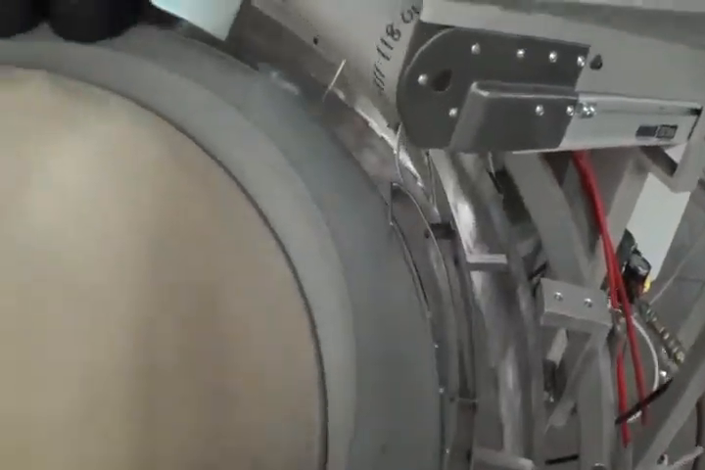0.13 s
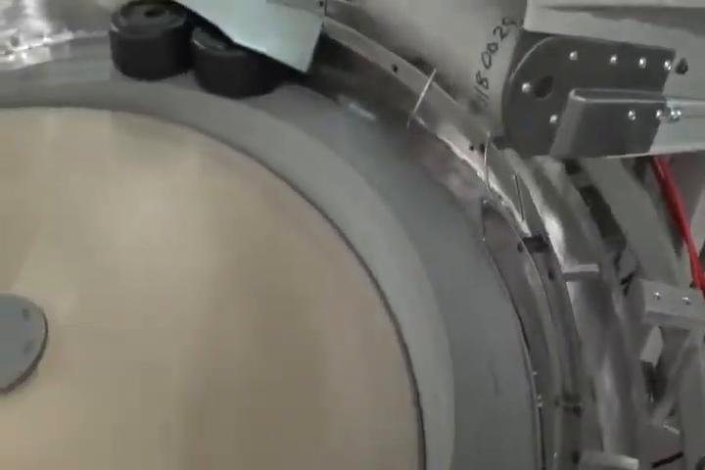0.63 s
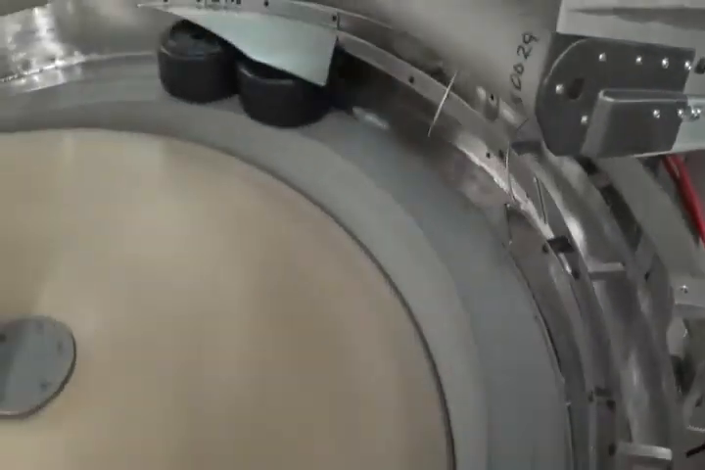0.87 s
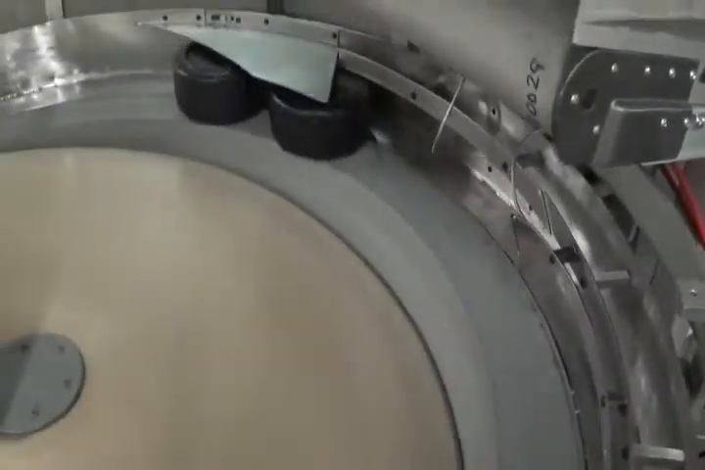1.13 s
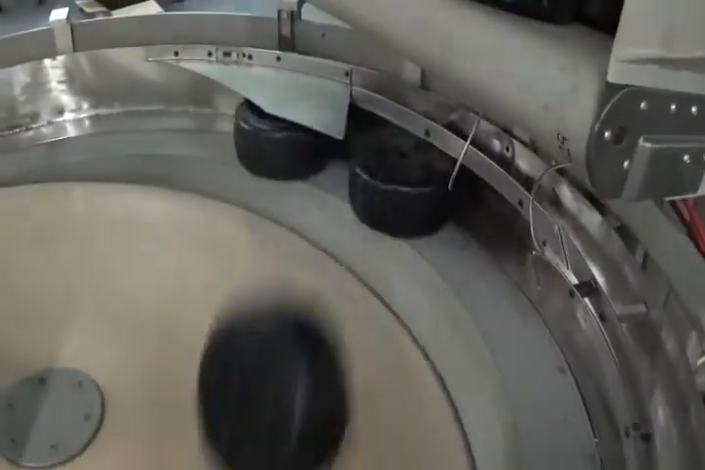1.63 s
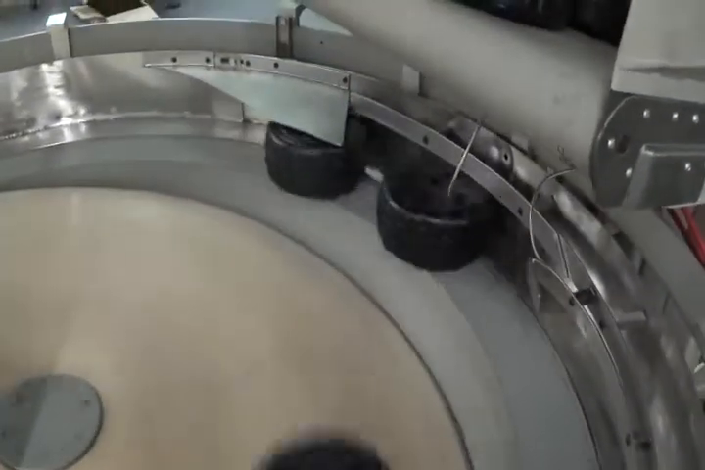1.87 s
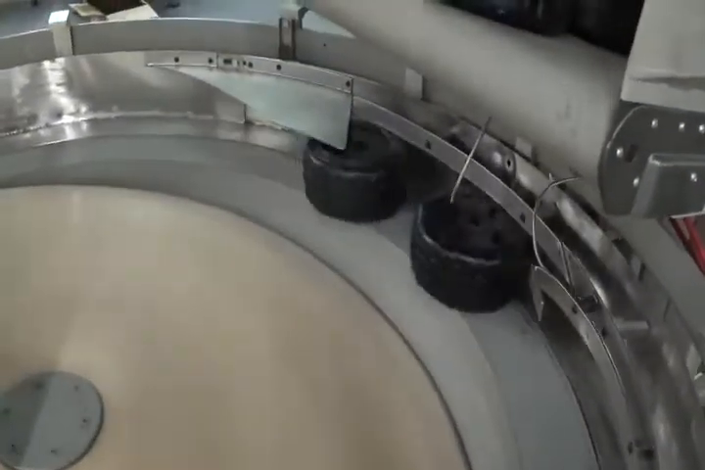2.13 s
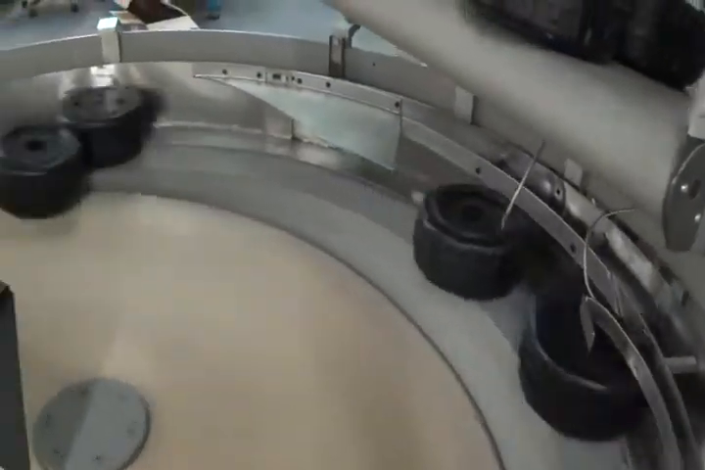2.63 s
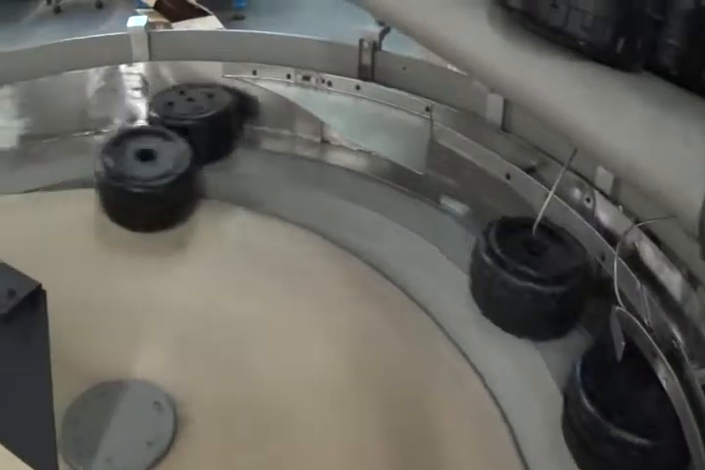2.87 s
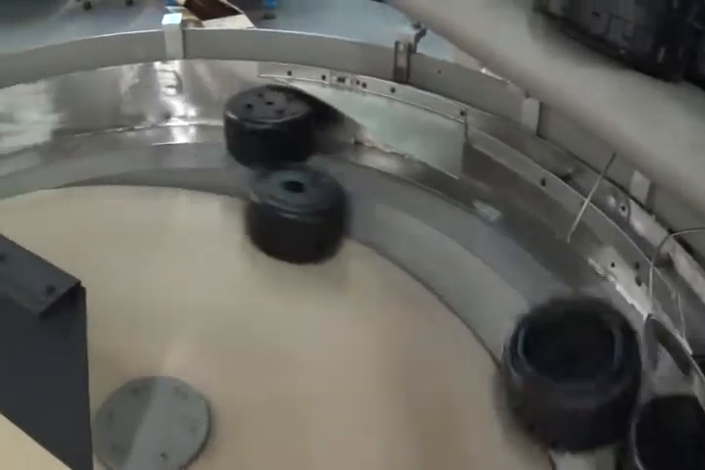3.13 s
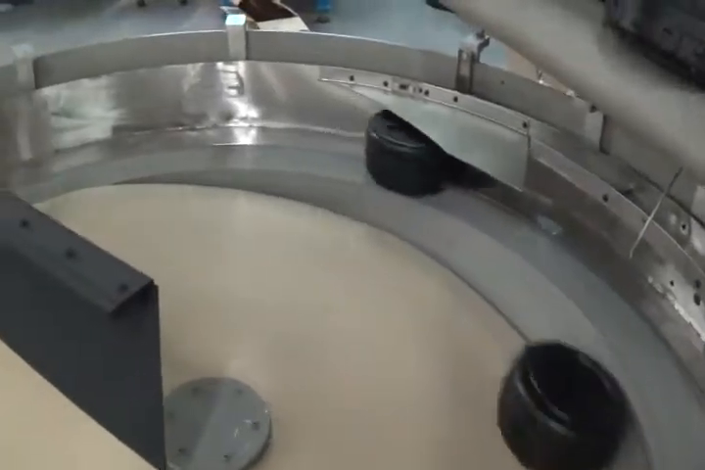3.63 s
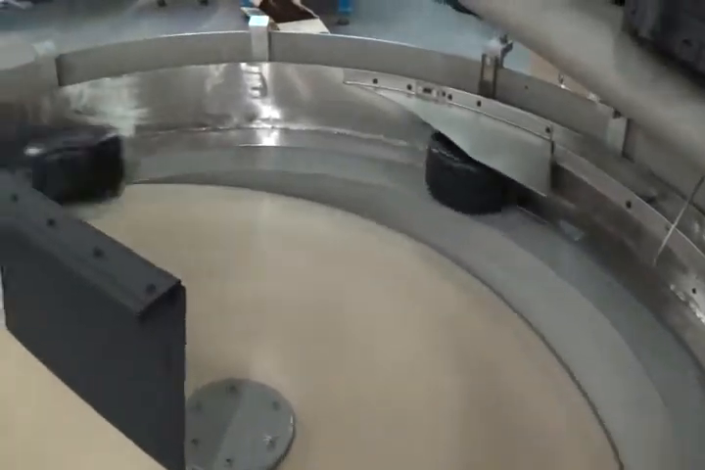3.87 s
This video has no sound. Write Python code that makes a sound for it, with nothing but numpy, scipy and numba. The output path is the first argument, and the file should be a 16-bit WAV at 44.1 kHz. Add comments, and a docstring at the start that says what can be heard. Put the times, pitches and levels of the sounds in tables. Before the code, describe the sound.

A continuous high, piercing air hiss dominates, wavering slightly and drifting left as the hand-held microphone turns; small wheels knock and scuff underneath, then air rushes lower over passing wheels, above a quiet factory hum.

```python
"""At a steel feeder bowl in a factory, compressed-air jets hiss along the rim round a slowly turning, hand-held
microphone pair. The jets are turbulence noise, filtered in bands; a delayed image from the bowl wall combs them.
Hollow plastic wheels knock, scuff and thud on track and disc as decaying modes, smeared by the bowl, and,
crossing a jet, add a lower rush of sliding band noise. A factory drones behind as coloured noise with two hums."""
import sys
import numpy as np
from scipy import signal
from scipy.fft import rfft, irfft
from scipy.io import wavfile
from scipy.ndimage import uniform_filter1d, map_coordinates
from numba import njit

SR = 44100
rng = np.random.default_rng(int(sys.argv[2]) if len(sys.argv) > 2 else 0)


def voltage_ratio(level):
    """Linear amplitude factor for a level in decibels (scalar or array-like)."""
    return 10 ** (np.asarray(level, float) / 20)


def wav_out(sig):
    """Save sig, one row per channel (or a flat mono array), as 16-bit PCM at SR to the path in sys.argv[1]."""
    wavfile.write(sys.argv[1], SR, np.round(np.clip(np.atleast_2d(sig).T, -1, 1) * 32767).astype(np.int16))


N = 176400


def read(table, col):
    """Linear interpolation: a table column over scene time."""
    a = np.array(table, float)
    return np.interp(np.arange(N) / SR, a[:, 0], a[:, col])


def at(table, hz):
    """Logarithmic frequency interpolation: a spectrum's value at hz."""
    a = np.array(table, float)
    return np.interp(np.log(hz), np.log(a[:, 0]), a[:, 1])


def unit(x):
    """Normalisation to an rms of 1."""
    return x / np.sqrt(np.mean(x ** 2))


def walk(rate):
    """Slow random modulation: levels held 1 / rate seconds, smoothed twice; spread near 1."""
    hold = int(SR / rate)
    steps = np.repeat(rng.standard_normal(N // hold + 1), hold)
    return 1.3 * uniform_filter1d(uniform_filter1d(steps, hold), hold)[:N]


def pan(x, db):
    """Intensity stereo: db is the level of left minus right."""
    return x * voltage_ratio(np.array([db, -db]).reshape(2, -1) / 2)


def bands(spectrum, gain_db, pan_db, count):
    """Filter-bank synthesis: noise in count bands an octave, each with a gain and side; total rms 1."""
    # stereo width, side against mid: f/Hz, level/dB
    side_spectrum = [(60, -10), (110, -23), (200, -19.5), (380, -13.5), (700, -7), (1290, -7.5),
                     (2380, -10), (4400, -10.5), (8120, -15), (15000, -19)]
    hz = np.maximum(np.arange(N // 2 + 1) * SR / N, 1)
    mid, side = rfft(rng.standard_normal((2, N))) * voltage_ratio(at(spectrum, hz))
    pair = mid + side * voltage_ratio(at(side_spectrum, hz)) * np.array([[1], [-1]])
    centres = 2 ** (np.arange(count * 15) / count)
    centres = centres[(centres > spectrum[0][0]) & (centres < spectrum[-1][0] * 1.2)]
    total = np.zeros((2, N))
    for centre in centres:
        # triangular on a log axis, so that neighbouring bands sum to one
        share = np.clip(1 - count * np.abs(np.log2(hz / centre)), 0, 1)
        band = irfft(pair * share, N) * voltage_ratio(gain_db(centre))
        total += pan(band, pan_db(centre))
    return unit(total)


@njit
def svf(x, hz, width):
    """State-variable resonance: a band-pass with a moving centre, gain 1 there; width is over centre."""
    y, band, low = np.empty(len(x)), 0., 0.
    for i in range(len(x)):
        g = np.tan(np.pi * hz[i] / SR)
        v = (band + g * (x[i] - low)) / (1 + g * (g + width))
        band, low, y[i] = 2 * v - band, low + 2 * g * v, width * v
    return y


def wall_image(hiss):
    """Comb filtering: direct sound plus a delayed reflection from the bowl wall, which favours treble."""
    # image in the bowl wall: t/s, delay/ms, level against the direct sound/dB (before the high-pass)
    reflection = [(0, .82, -19), (.5, .808, -17), (.9, .779, -16), (1.1, .763, -13), (1.9, .746, -13),
                  (2.3, .734, -12), (2.7, .735, -18), (3.2, .735, -24), (3.5, .525, -21), (4, .44, -19)]
    source_sample = np.arange(N) - read(reflection, 1) * SR / 1000
    gain = voltage_ratio(read(reflection, 2))
    image = np.array([map_coordinates(ch, [source_sample], mode="mirror") for ch in hiss])
    image = signal.filtfilt(*signal.butter(1, 3000, "high", fs=SR), image)
    return (hiss + gain * image) / np.sqrt(1 + gain ** 2)


def jets():
    """Turbulent mixing noise of jets, whose spectral tilt and side follow the turning view."""
    # jet spectrum as the microphone hears it, with its resonance near 9.6 kHz: f/Hz, relative level/dB
    jet_spectrum = [(700, -41), (1300, -24.5), (2500, -19.5), (4000, -16), (5500, -11), (7000, -7),
                    (8300, -2.5), (9650, 0.5), (10200, -1), (11000, -3), (12500, -7), (14000, -12),
                    (15900, -16)]
    # turning view: t/s, level before a fixed lift/dB, top octave against the peak/dB,
    # lower skirt against the peak/dB, left minus right/dB
    view = [(0.0, -17.5, -3.5, -8.5, -0.38), (0.07, -19, -1, -9.5, 1), (0.2, -16, -6.5, -12.5, 0.0),
            (0.59, -16.5, -5.5, -11.5, -1), (0.92, -19.5, -3, -7, -0.5), (2.06, -20.5, 1, -5, -1.9),
            (2.12, -18.5, -2.5, -6.5, -1.5), (2.49, -18.5, -5.5, -7, -2), (2.6, -18, -1, -8, -2.5),
            (2.92, -18, -6, -6, -1.75), (3.1, -21.5, -4, -2, -1.5), (3.2, -17.5, -8.5, -7.5, -3),
            (3.27, -21, -5.5, -7, -2.5), (3.4, -20.5, -5, -6.5, -3.5), (4.0, -21.5, -7, -5.5, -4.5)]
    # change of the highest hiss: t/s, level/dB
    edge_level = [(0, 2), (1.3, 3.5), (1.9, -6), (2.7, 0), (3.1, 1.5), (4, 7)]
    peak_hz, edge_hz, edge_pan_share = 9280, 12500, 0.3
    swell_db, flicker_db = -0.2, 0.72  # each multiplies a random walk
    # tilt relative to the top (-5 dB) and skirt (-7.5 dB) at which the jets sound as in jet_spectrum
    top, skirt = read(view, 2) + 5, read(view, 3) + 7.5
    edge, side, swell = read(edge_level, 1), read(view, 4), walk(2.92)

    def gain_db(centre):
        if centre > peak_hz:
            tilt = top * min(2.5 * np.log2(centre / peak_hz), 1)
        else:
            tilt = skirt * min(1.76 * np.log2(peak_hz / centre), 1)
        edge_share = np.clip(3.5 * np.log2(centre / edge_hz), 0, 1)
        return tilt + edge_share * edge + swell_db * swell + flicker_db * walk(12)

    def pan_db(centre):
        # the highest hiss stays nearer the middle
        above_peak = np.clip(3 * np.log2(centre / peak_hz), 0, 1)
        return side * (1 - (1 - edge_pan_share) * above_peak)

    hiss = bands(jet_spectrum, gain_db, pan_db, count=4)
    return wall_image(hiss) * voltage_ratio(read(view, 1) + 2.5)


def rush():
    """Flow-obstacle noise: air breaking over a passing wheel, a fluttering band with a moving centre."""
    # wheels crossing a jet: start t/s, length/s, level before swell and flutter/dB,
    # first centre f/Hz, last centre f/Hz, width over centre
    crossings = [(2.133, 0.3, -38.5, 2270, 2180, .12), (2.132, 0.36, -31, 5350, 5250, 0.35),
                 (2.599, .1, -37, 4000, 3000, 0.55), (2.718, 0.071, -26, 5900, 4500, 0.86),
                 (2.769, 0.1, -28.5, 2800, 1210, 3.2), (2.889, 0.19, -22.5, 5550, 4740, 0.58),
                 (2.909, 0.11, -29.5, 3980, 4140, 0.084), (2.969, 0.12, -28.5, 3320, 2420, .7),
                 (3.06, 0.14, -26.5, 4000, 3000, 1.2), (3.173, 0.16, -24.5, 5470, 3480, 1.5),
                 (3.201, 0.16, -31.5, 2000, 1300, 1.7)]
    lateness = 1.15  # over 1 the swell peaks late and stops fast
    out = np.zeros((2, N))
    for start, length, db, from_hz, to_hz, width in crossings:
        i, n = int(start * SR), int(length * SR)
        hz = np.geomspace(from_hz, to_hz, n)
        mid, side = (unit(svf(rng.standard_normal(n), hz, width)) for _ in range(2))
        pair = mid + voltage_ratio(-10.5) * side * np.array([[1], [-1]])
        swell = np.sin(np.pi * (np.arange(n) / n) ** lateness) ** 0.6
        out[:, i:i + n] += pan(pair * swell * voltage_ratio(db), -2.5)
    return out * voltage_ratio(1.2 * walk(45))  # flutter


def ring(modes, t):
    """Modal superposition: decaying modes after one soft blow, neighbours in opposite phase."""
    contact_s = 0.0012  # time constant of the onset
    total = np.zeros(len(t))
    for k, (hz, db, t60) in enumerate(modes):
        total += (-1) ** k * voltage_ratio(db - 60 * t / t60) * np.sin(2 * np.pi * hz * t)
    return (1 - np.exp(-t / contact_s)) * total


def wheel_knocks(t):
    """Impact excitation of wheels on track and each other: hollow, rim and clack; rattles between."""
    # knocks, and a noisy scuff at 3.655: t/s, level/dB, hollow pitch and clack centre f/Hz,
    # rim level/dB, clack level/dB, left minus right/dB
    knock_list = [(.875, -35, 450, -9, -4, 2), (.882, -28, 995, -3.5, -8, 1),
                  (1.086, -32.5, 960, -13, -1.5, 6), (1.089, -30, 1130, -6, -6, -1),
                  (1.59, -36, 880, -1, 0, 1), (1.797, -31, 956, -12, 2, -2),
                  (2.074, -21.5, 1086, -8, -4, 0), (2.197, -29.5, 975, -3, -5, 0),
                  (2.61, -32, 550, -9, -9, -1), (3.237, -31, 1220, -17, -14, -10),
                  (3.251, -27.5, 522, -15, -22, -2), (3.655, -32, 1890, -10, 4.5, 0),
                  (3.675, -27.5, 880, -7.5, -7, -1), (3.879, -28.5, 920, -1, -13, 0),
                  (3.985, -37, 940, -4, -10, 0)]
    # rim modes: f/Hz, level/dB, T60/s
    rim_modes = [(585, 0, 0.13), (757, -10, 0.08), (930, -3, 0.044), (1510, 0, 0.029), (305, 2, 0.037)]
    hollow_t60_s, clack_t60_s, clack_width = 0.086, 0.063, 1.8  # width over centre
    rattles_per_s, rattle_db, rattle_spread_db = 20, -48, 4
    draws = rng.random((int(rattles_per_s * N / SR), 4))
    rattles = [(a * N / SR, rattle_db + rattle_spread_db * (2 * b - 1), 850 + 400 * c, -12 * d, 0, 0)
               for a, b, c, d in draws]
    out = np.zeros((2, N + SR))
    for start, db, hz, rim_db, clack_db, pan_db in list(knock_list) + rattles:
        centre = np.full(len(t), float(hz))
        noise = svf(rng.standard_normal(len(t)), centre, clack_width)
        clack = unit(svf(noise, centre, clack_width)) * voltage_ratio(clack_db - 60 * t / clack_t60_s)
        hollow = ring([(hz, 0, hollow_t60_s)], t)
        blow = hollow + voltage_ratio(rim_db) * ring(rim_modes, t) + clack
        i = int(start * SR)
        out[:, i:i + len(t)] += pan(blow * voltage_ratio(db), pan_db)
    return out


def disc_thuds(t):
    """Plate vibration: thuds that excite the disc's modes, the low ones making a boom."""
    # landings and short low scuffs: t/s, level/dB, boom level added to the low modes/dB
    thuds = [(.002, -25, -6), (1.79, -23.5, -0.5), (1.805, -33, 1), (3.298, -32, -6), (3.308, -36, -9),
             (3.314, -27, -13), (3.387, -32, -2), (3.677, -35, -9)]
    # disc modes: f/Hz, level before the boom/dB, T60/s
    disc_modes = [(85.5, -13, 0.098), (120.5, -14, 0.22), (180, -4.5, 0.06), (294, -4, 0.1),
                  (464, 5, 0.024), (656, 0.5, 0.019), (880, -11.5, 0.022)]
    boom_hz = 350  # modes below it make the boom
    out = np.zeros((2, N + SR))
    for start, db, boom_db in thuds:
        modes = [(hz, level + boom_db * (hz < boom_hz), t60) for hz, level, t60 in disc_modes]
        i = int(start * SR)
        out[:, i:i + len(t)] += voltage_ratio(db) * ring(modes, t)
    return out


def knocks():
    """Reverberation by convolution: the bowl smears knocks and thuds with a decaying noise tail."""
    bowl_db, bowl_t60_s = -10, 0.25
    t = np.arange(SR // 4) / SR
    blows = wheel_knocks(t) + disc_thuds(t)
    tail = rng.standard_normal((2, len(t))) * voltage_ratio(-60 * t / bowl_t60_s)
    tail = tail / np.sqrt(np.sum(tail ** 2, axis=1, keepdims=True))  # unit energy
    smeared = signal.fftconvolve(blows, tail, axes=1)[:, :N + SR]
    return (blows + voltage_ratio(bowl_db) * smeared)[:, :N]


def hall():
    """Broadband noise with two resonant hums: a factory drone of wavering level."""
    # drone spectrum: f/Hz, relative level/dB
    drone_spectrum = [(12, -33), (22, -31), (58, -21), (163, -5.5), (228, -4.5), (293, -1.5), (436, -4),
                      (573, -6), (853, -7), (947, -4.5), (1470, -9), (3000, -10), (3900, -13.5),
                      (6600, -120)]
    # drone level: t/s, bass level before a fixed lift/dB, middle against bass/dB
    drone_level = [(0.0, -44.5, 2.5), (0.23, -44.5, 1), (1.05, -42, -1), (1.39, -43.5, -0.5),
                   (2.06, -44, 0), (2.43, -40.5, 2.5), (3.3, -41.5, 0), (3.37, -42, -0.5), (4.0, -40.5, -2)]
    # hums: f/Hz, width of each of two filters/Hz, level before wavering/dB
    hums = [(291.7, 19, -61.5), (576, 13.6, -53.5)]
    middle_hz = 450  # where the middle begins
    middle, swell = read(drone_level, 2), walk(2.5)

    def gain_db(centre):
        middle_share = np.clip(np.log2(centre / middle_hz), 0, 1)
        return middle * middle_share + 0.43 * swell + 2.24 * walk(7.78)

    out = bands(drone_spectrum, gain_db, lambda centre: 0, count=2) * voltage_ratio(read(drone_level, 1) + 4.5)
    for hz, width_hz, db in hums:
        centre = np.full(N, float(hz))
        noise = svf(rng.standard_normal(N), centre, width_hz / hz)
        noise = svf(noise, centre, width_hz / hz)
        out = out + unit(noise) * voltage_ratio(db + 2 * walk(2.48))
    return out


def scene():
    """Linear superposition at the microphone pair; knocks and thuds carry no deep bass."""
    bass_cut = signal.butter(4, 60, "high", fs=SR, output="sos")
    return jets() + rush() + signal.sosfilt(bass_cut, knocks()) + hall()


def band_limit(x):
    """A steep low-pass at the top of the band."""
    return signal.sosfilt(signal.butter(12, 16620, fs=SR, output="sos"), x)


def record(dry):
    """Saturation and band limiting: peaks are rounded, then the top is cut at 15.7 kHz."""
    rounded = np.tanh(1.118 * dry) / 1.081
    top_cut = signal.ellip(14, 0.2, 70, 15700, fs=SR, output="sos")
    mix = signal.sosfilt(top_cut, rounded)
    return band_limit(mix)


dry = scene()
out = record(dry)
wav_out(out)
```